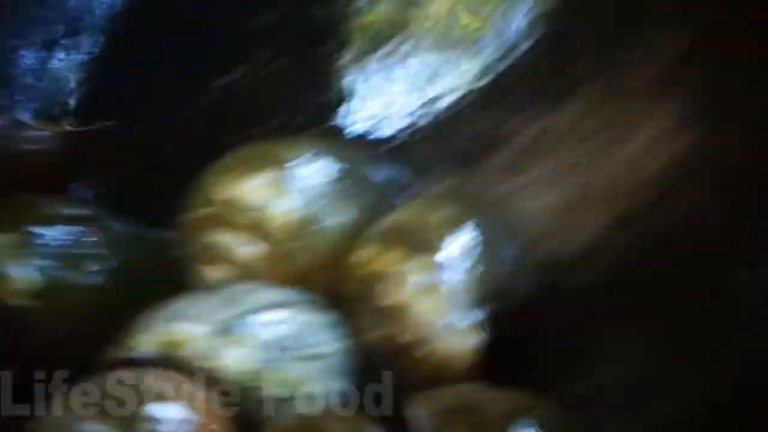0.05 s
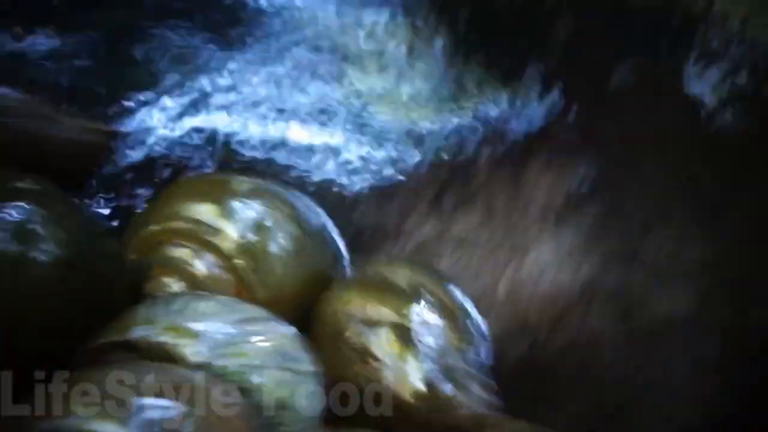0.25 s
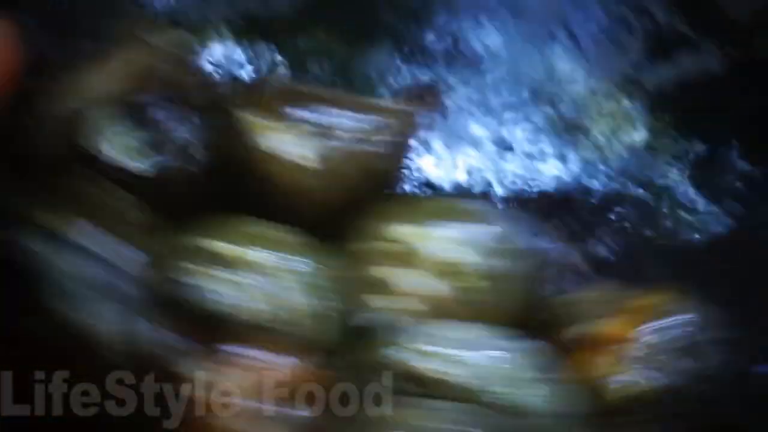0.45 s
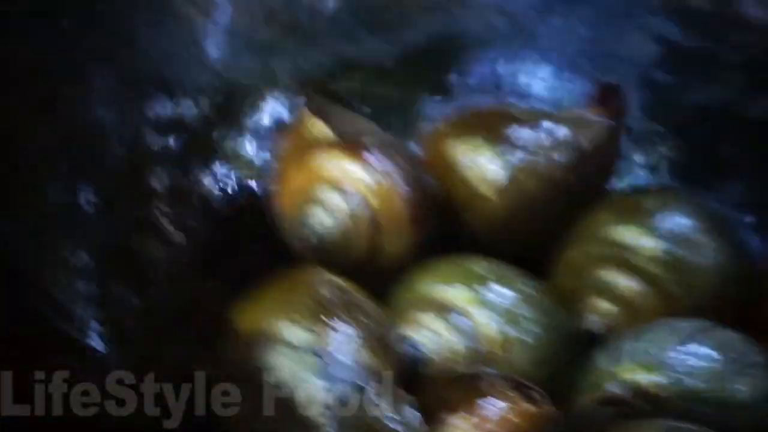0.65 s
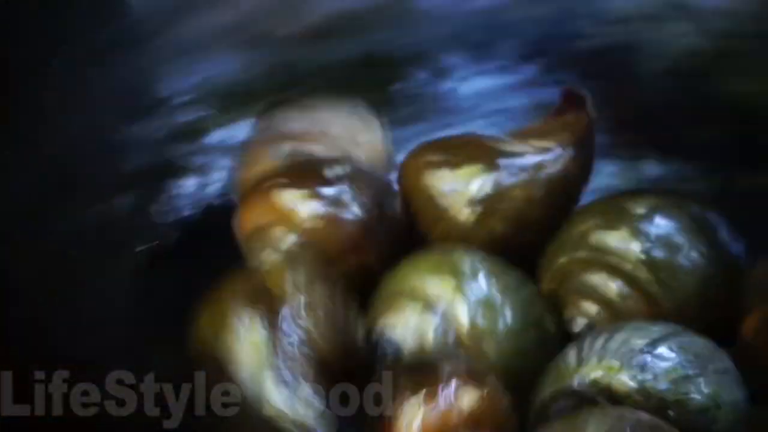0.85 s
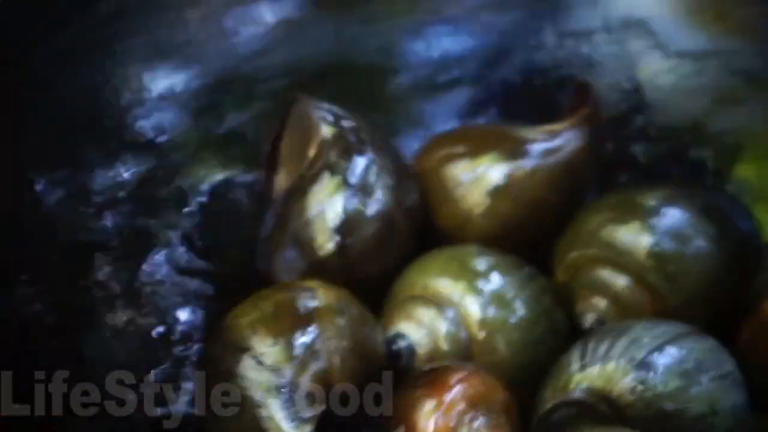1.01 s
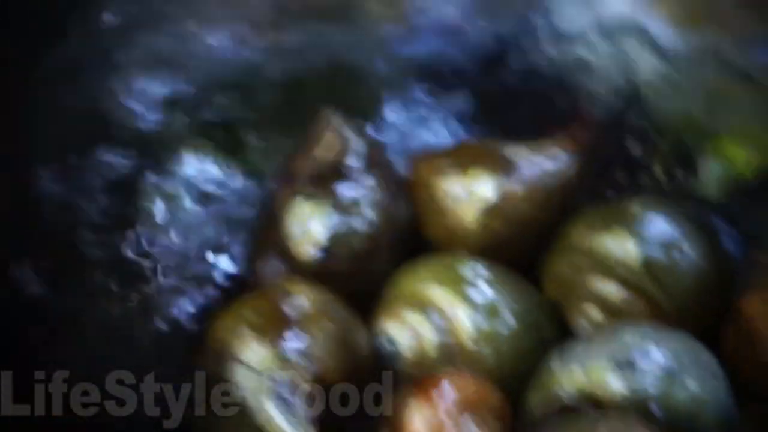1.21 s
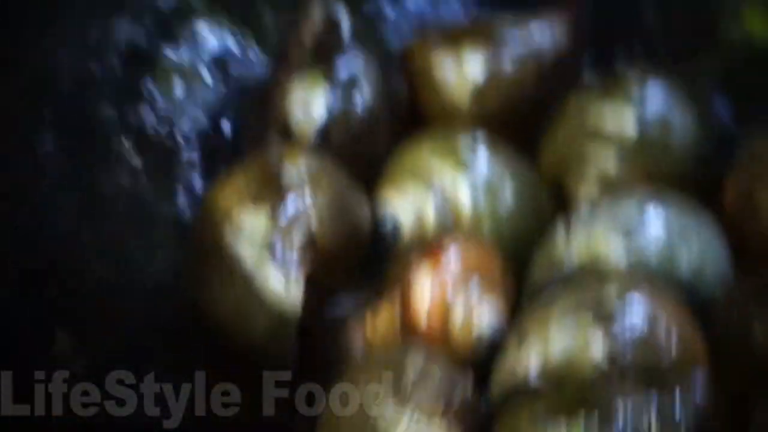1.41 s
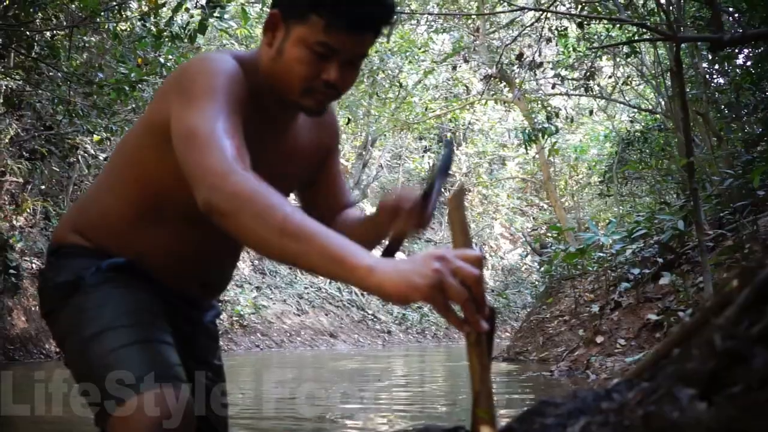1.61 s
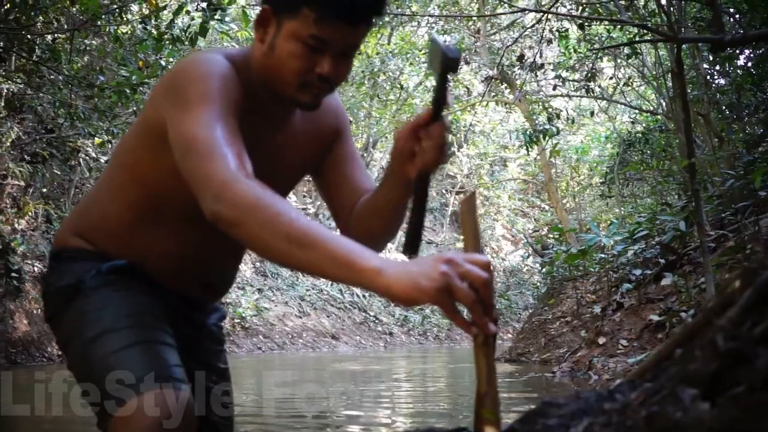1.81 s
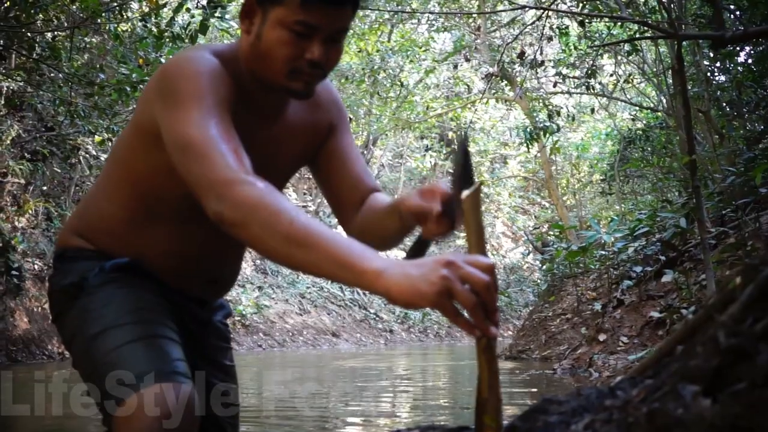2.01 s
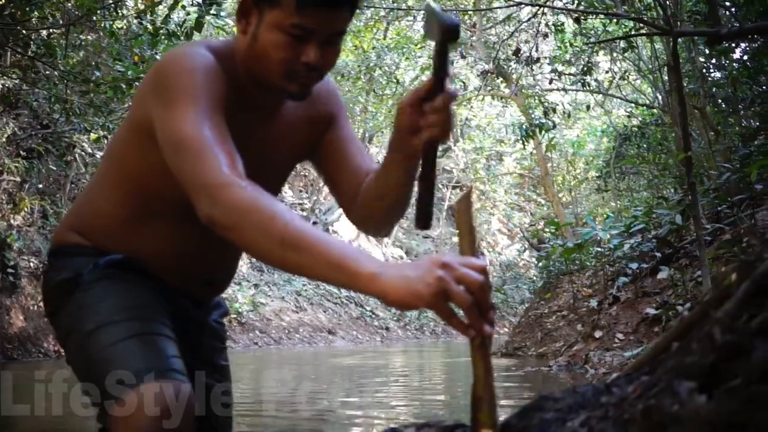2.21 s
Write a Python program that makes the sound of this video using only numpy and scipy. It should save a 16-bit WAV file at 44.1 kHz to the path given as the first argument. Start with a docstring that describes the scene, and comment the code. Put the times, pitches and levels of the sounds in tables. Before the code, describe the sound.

Wet snail shells are stirred in a tub, scraping and clicking with hollow bumps from about 0.2 to 0.7 seconds. A second run of quick strokes starts near 0.8 seconds and fades by 1.4. At 1.5 seconds the sound changes to a soft open stream with a few small drips. Just before 2 seconds, a hammer strikes a wooden stake once, with a sharp crack and brief echo.

```python
"""Snail shells stirred beside a stream

Wet shells are stirred by hand in a tub: stick-slip friction rings shells and tub in strokes of dense
scraping, with bumps, sharp clicks and hollow resonances that slide as single shells are dragged along.
At 1.5 s the scene changes to the open stream, where drops plink as their bubbles ring
and a hammer strikes a wooden stake once."""
import sys
import numpy as np
from scipy import signal
from scipy.fft import rfft, irfft
from scipy.io import wavfile

SR = 44100
rng = np.random.default_rng(int(sys.argv[2]) if len(sys.argv) > 2 else 0)


def master(y):
    """Save y as 16-bit WAV."""
    cut = np.clip(np.atleast_2d(y).T, -1, 1)
    pcm = np.round(cut * 32767)  # scale
    wavfile.write(sys.argv[1], SR, pcm.astype(np.int16))


N = 103635

# Modes of the tub and of a shell. Each row: nominal frequency in Hz, nominal bandwidth in Hz, gain in dB.
TUB_RESONANCES = [(274, 101.3, -1.5), (344, 108, 0.5), (433.4, 97, -5), (660, 94, -7), (783, 146, -8.5)]
SHELL_RESONANCES = [(1390, 235, -2), (1830, 220, 2.5), (2135, 214, 3), (2553, 220, 0.5), (3406, 564, -2)]
# Spectrum of a shell's click and a drop's splash. Each row: frequency in Hz, gain in dB.
CLICK_SPECTRUM = [(500, -29), (2500, -30), (4500, -1.5), (6800, -2.5), (9000, -4.5), (11200, -5)]
TUB_BAND_HZ, SHELL_BAND_HZ = (180, 1270), (930, 4700)
SLIPS_PER_S, SLIP_SPREAD_DB = 3300, 3


def stroke(rise, hold, fall, shells_db, tub_db, grit_db, rumble_db, shell_pitch, tub_pitch, count=5):
    """Stick-slip friction: the slips of several shells ring them and the tub, and crush grit."""
    # Spectra of the flexing tub and of the grit. Each row: frequency in Hz, gain in dB.
    rumble_spectrum = [(20, -4), (60, -12), (170, 7.5), (260, 3.5), (600, -49), (3000, -84)]
    grit_spectrum = [(300, -34), (2000, -22), (4200, 4.5), (5200, 1.5), (6300, -0.5), (7600, -3.5),
                     (9900, 0), (11200, -5)]
    t = np.arange(0, rise + hold + fall, 1 / SR)
    n = len(t)
    push = np.minimum(t / rise, 1) ** 1.16 * np.clip((t[-1] - t) / fall, 0, 1) ** 1.49
    chatter = amp(1.28 * wander(n, step_s=0.00804))
    slips = [impulses(n, SLIPS_PER_S / count, SLIP_SPREAD_DB) * chatter
             * amp(2 * wander(n, step_s=0.01436)) for _ in range(count)]  # each shell turns on its own
    shells = amp(shells_db) * shell_ring(slips, shell_pitch)
    tub = amp(tub_db) * unit_rms(resonate(sum(slips), TUB_RESONANCES, TUB_BAND_HZ, tub_pitch))
    rumble = amp(rumble_db) * unit_rms(colour(sum(slips), rumble_spectrum))
    grains = impulses(n, per_s=5000, spread_db=2.5) * chatter
    grit = amp(grit_db) * unit_rms(colour(grains, grit_spectrum))
    return push * reflections(shells + tub + grit + rumble)


def shell_ring(slips, pitch, tone_spread=0.092, glide_depth=0.029, tone_db=-6.5):
    """Forced resonance: shells of several sizes ring in broad modes and in tones that slide as they turn."""
    # A shell's clear tones. Each row: nominal frequency in Hz, bandwidth in Hz, gain in dB.
    clear_tones = [(1708, 74, 0), (2200, 58, 1), (3406, 85, -0.5)]
    n = len(slips[0])
    tunings = pitch * (1 + 0.038 * np.linspace(-1, 1, len(slips)))
    hollow = sum(resonate(x, SHELL_RESONANCES, SHELL_BAND_HZ, tuning)
                 for x, tuning in zip(slips, tunings))
    glides = [tuning * (1 + tone_spread * rng.uniform(-1.003, 1) + glide_depth * wander(n, 0.0296))
              for tuning in tunings]
    tones = sum(amp(db) * sliding_resonance(x, hz * glide, width)
                for x, glide in zip(slips, glides) for hz, width, db in clear_tones)
    return unit_rms(unit_rms(hollow) + amp(tone_db) * unit_rms(tones))


def bump(tub_db, shells_db, click_db, pitch):
    """Impact excitation: a shell drops against its neighbours and the tub, with a brief crunch."""
    contact = burst(t60=0.028)
    contact[0] = amp(16.5)  # the hard first strike
    tub = amp(tub_db) * fixed_energy(resonate(contact, TUB_RESONANCES, TUB_BAND_HZ, pitch))
    shells = amp(shells_db) * fixed_energy(resonate(contact, SHELL_RESONANCES, SHELL_BAND_HZ, pitch))
    click = amp(click_db) * fixed_energy(colour(burst(t60=0.035), CLICK_SPECTRUM))
    return reflections(tub + shells + click)


def drag(path):
    """Friction excites one shell, whose resonance slides as it turns against the others."""
    times, hz, db = np.transpose(path)
    t = np.arange(times[0], times[-1], 1 / SR)
    slips = impulses(len(t), SLIPS_PER_S, SLIP_SPREAD_DB)
    tone = unit_rms(sliding_resonance(slips, np.interp(t, times, hz), width_hz=196))
    return reflections(tone * amp(np.interp(t, times, db)) * signal.windows.tukey(len(t), .1))


def hammer(crack_db, ring_db, size=12000):
    """Damped free vibration: steel cracks on the stake, which rings; the bank and the forest echo."""
    # Modes of the stake. Each row: frequency in Hz, gain in dB, 60 dB decay time in seconds.
    stake_modes = [(220, 5, 0.035), (1470, 0, 0.035), (2145, 3.5, .03), (2570, 2.5, 0.042),
                   (2640, -3, 0.043), (6635, 1.5, 0.034), (9370, 0, 0.034)]
    # Spectra of the crack and of the forest's echo. Each row: frequency in Hz, gain in dB.
    crack_spectrum = [(100, -11), (270, 8), (800, -5.5), (1500, -3), (2600, 2), (3600, 3), (6500, 2),
                      (8000, 0), (9800, 7), (11200, 0.5)]
    forest_spectrum = [(300, 1), (800, -7), (11000, -1.5)]

    def stereo_burst(spectrum, t60):
        return np.array([fixed_energy(colour(burst(t60, size), spectrum)) for _ in range(2)])

    t = np.arange(size) / SR
    ring = sum(amp(db) * decay(t, t60) * np.sin(2 * np.pi * hz * t) for hz, db, t60 in stake_modes)
    blow = amp(crack_db) * stereo_burst(crack_spectrum, t60=0.024) + amp(ring_db) * fixed_energy(ring)
    bank = amp(-2) * stereo_burst(crack_spectrum, t60=0.052)
    forest = amp(-8.5) * stereo_burst(forest_spectrum, t60=0.28)
    add(blow, .0052, amp(crack_db) * (bank + forest))
    return blow


def drop(hz, db, t60, pan_db, rise_per_s=1.1, attack_s=0.00056):
    """Bubble resonance: a drop splashes and traps air, which rings with rising pitch as it dies."""
    t = np.arange(4096) / SR
    phase = 2 * np.pi * hz * (t + rise_per_s * t ** 2 / 2)
    bubble = np.sin(phase) * decay(t, t60) * np.minimum(t / attack_s, 1)
    splash = amp(-9.5) * colour(burst(t60=0.027), CLICK_SPECTRUM)
    return amp(db) * (bubble + splash) * amp([[pan_db / 2], [-pan_db / 2]])


def stream(spectrum, levels):
    """Random superposition: countless ripples merge into a wash over a low rumble."""
    # Likeness of the two ears. Each row: frequency in Hz, correlation from 0 to 1.
    ear_correlation = [(170, 0.95), (480, 0.33), (1400, 0.46), (4000, 0)]
    hz = np.fft.rfftfreq(N, 1 / SR)
    left, independent = (rfft(impulses(N, per_s=9000, spread_db=4)) for _ in range(2))
    likeness = np.clip(at_frequency(ear_correlation, hz), 0, 1)
    right = likeness * left + np.sqrt(1 - likeness ** 2) * independent
    wash = irfft(np.array([left, right]) * amp(at_frequency(spectrum, hz)), N)
    return unit_rms(wash) * amp(np.interp(np.arange(N) / SR, *np.transpose(levels)))


def reflections(x, right_lag_s=.000014):
    """Decorrelation: near reflections spread a sound between the ears, the treble most."""
    # Strength of the reflections. Each row: frequency in Hz, gain in dB.
    side_spectrum = [(350, -14.5), (750, -9), (1300, -13), (2200, -9.5), (3500, -4), (5500, -2)]
    tail = burst(t60=0.025, size=8192)
    reflected = signal.fftconvolve(x, tail / np.linalg.norm(tail))[:len(x)]
    side = colour(reflected, side_spectrum)
    lag = np.exp(-2j * np.pi * np.fft.rfftfreq(len(x), 1 / SR) * right_lag_s)
    right = irfft(rfft(x - side) * lag, len(x))
    return np.array([x + side, right]) / np.sqrt(1 + np.sum(side ** 2) / np.sum(x ** 2))


def resonate(x, modes, band_hz, pitch):
    """Modal superposition: broad modes of alternating sign, radiating only within a band."""
    ring = sum((-1) ** k * amp(db) * signal.lfilter(*signal.iirpeak(hz * pitch, hz / width, SR), x)
               for k, (hz, width, db) in enumerate(modes))
    radiation = signal.butter(3, np.multiply(band_hz, pitch), "band", fs=SR, output="sos")
    return signal.sosfilt(radiation, ring)


def sliding_resonance(x, hz, width_hz):
    """Two resonators in cascade, each width_hz wide, follow the pitch curve hz."""
    carrier = np.exp(2j * np.pi * np.cumsum(hz) / SR)
    pole = np.exp(-np.pi * width_hz / SR)
    envelope = signal.lfilter([(1 - pole) ** 2], [1, -2 * pole, pole * pole], x / carrier)
    return 2 * (carrier * envelope).real


def colour(x, spectrum, size=2048):
    """Minimum-phase filtering with the given spectrum."""
    log_gain = np.log(amp(at_frequency(spectrum, abs(np.fft.fftfreq(size, 1 / SR)))))
    taps = np.fft.ifft(np.exp(np.conj(signal.hilbert(log_gain)))).real
    return signal.fftconvolve(x, taps[:size // 2])[:len(x)]


def impulses(n, per_s, spread_db):
    """Shot noise: random impulses, a few much stronger than the rest."""
    chance, size, sign = rng.random((3, N))[:, :n]
    strength = amp(-spread_db * np.log(np.maximum(size, .02)))
    return (chance < per_s / SR) * strength * np.sign(sign - .5)


def burst(t60, size=4096):
    """Exponentially damped white noise."""
    return rng.choice([-1., 1.], size) * decay(np.arange(size) / SR, t60)


def wander(n, step_s):
    """Random drift between Gaussian values step_s apart."""
    knots = rng.standard_normal(N // 16)
    return np.interp(np.arange(n) / SR / step_s, np.arange(len(knots)), knots)


def decay(t, t60):
    """Exponential decay by 60 dB in t60 seconds."""
    return np.exp(-np.log(1000) * t / t60)


def amp(db):
    """Decibels to amplitude ratio."""
    return 10 ** (np.asarray(db) / 20)


def unit_rms(x):
    """Normalises mean power to 1."""
    return x / np.sqrt(np.mean(x ** 2) + 1e-20)


def fixed_energy(x):
    """Normalises a transient to the energy of 5 ms at rms 1."""
    return x * np.sqrt(220) / np.linalg.norm(x)


def at_frequency(points, hz):
    """Interpolates a table on a log-frequency axis."""
    frequencies, values = np.transpose(points)
    return np.interp(np.log(hz + 1), np.log(frequencies + 1), values)


def add(mix, start_s, sound):
    """Superposes a stereo sound on the mix."""
    part = mix[:, max(round(start_s * SR), 0):][:, :sound.shape[-1]]
    part += sound[..., :part.shape[1]]


def scene():
    """Linear superposition of shells, hammer, drops and stream."""
    # Strokes of the hand. Each row: start, rise, hold and fall in seconds, levels of shells, tub, grit
    # and rumble in dB, pitch factors of shells and tub.
    strokes = [(0.149, 0.02, 0.065, .03, -50.5, -45.5, -48.5, -54, 1.1, 1.84),
               (0.194, 0.13, 0.018, 0.057, -23, -24, -31, -37.5, 0.95, 0.99),
               (0.336, 0.052, 0.027, 0.036, -18.5, -26, -29, -41, 1.003, 0.94),
               (.41, 0.056, 0.065, 0.08, -20, -25, -30.5, -62, 0.99, 0.98),
               (.525, 0.029, 0.051, 0.092, -21, -24, -31.5, -52, 0.99, 0.99),
               (0.738, 0.033, 0.019, 0.037, -33.5, -35.5, -45.5, -74, 0.98, 1),
               (0.838, 0.044, 0.044, 0.039, -18, -25, -31, -45, 1.013, 1.07),
               (0.948, 0.023, 0.061, 0.06, -18, -24.5, -28.5, -46.5, 0.98, 1.096),
               (1.064, 0.039, 0.026, 0.022, -19, -26.5, -31, -54, 1, 1.1),
               (1.135, 0.055, .004, 0.064, -21.5, -24.5, -35, -55, 0.98, 1.176),
               (1.248, 0.053, 0.0081, 0.051, -27.5, -29.5, -40, -64, 0.95, 1.06),
               (1.336, 0.026, 0.08, 0.034, -54, -47, -61, -71, 0.69, 1.02)]
    # Shell impacts. Each row: start in seconds, levels of tub, shells and click in dB, pitch factor.
    bumps = [(.090, -42, -48.5, -49, 1.93), (.147, -51, -54, -26, 0.88), (.200, -30, -30, -46, 0.66),
             (0.2093, -21, -30, -48, 0.98), (.262, -26.5, -27, -38, 0.83), (0.239, -25.5, -24.5, -52, 0.94),
             (.335, -30, -18, -31, 0.93), (.3735, -25, -22, -32, 1.13), (.406, -31.5, -18.5, -42.5, 1.12),
             (.427, -49, -30, -20, 1.4), (0.5249, -38, -22, -43, 0.946), (0.8512, -20, -32, -38.5, 0.997),
             (0.854, -24.5, -28, -35, 1.07), (.934, -23.5, -29, -26, 0.75),
             (1.0568, -22.5, -19.5, -47, 0.95), (1.077, -29, -21, -30.5, 1.06),
             (1.1038, -26, -20, -39, 0.97), (1.1324, -25, -17.5, -29.5, 1.07),
             (1.1832, -25, -15, -29, 1.04), (1.2, -50, -19.5, -31, 1.16), (1.268, -30, -31.5, -47, 0.88),
             (1.300, -42, -22, -48, 0.9), (1.320, -34.5, -28, -45, 0.85), (1.372, -42, -44, -54, 0.91),
             (1.398, -39.5, -44, -53, 1.08), (1.4293, -40, -28.5, -37.5, 1.08)]
    # One path per dragged shell. Each row of a path: time in seconds, pitch in Hz, level in dB.
    drag_paths = [
        [(.262, 3440, -33), (.295, 3350, -29.5), (.335, 3510, -30.5), (.35, 3400, -40)],
        [(.44, 1810, -29), (.468, 1695, -26), (.505, 1616, -27), (.527, 1480, -21.5), (.552, 1370, -37),
         (.612, 1380, -27), (.63, 1410, -42)],
        [(.47, 1980, -41), (.505, 2060, -28), (.524, 2290, -20.5), (.55, 2040, -24), (.577, 2050, -22.5),
         (.605, 2150, -26), (.627, 2090, -31), (.646, 2160, -32), (.66, 2177, -47)],
        [(1.177, 1880, -26), (1.197, 2140, -24), (1.212, 1870, -31), (1.236, 1730, -32)],
    ]
    # The hammer blow: start in seconds, levels of crack and ring in dB.
    blow = (1.9514, -20, -24)
    # Falling drops. Each row: start in seconds, initial pitch in Hz, level in dB,
    # 60 dB decay time in seconds, left over right in dB.
    drops = [(1.529, 1340, -42, 0.015, 13), (1.532, 814, -44.5, 0.12, 12), (1.562, 1850, -37, 0.043, 10),
             (1.637, 1340, -39.5, 0.019, 17), (1.644, 2900, -36.5, 0.02, 11), (1.9267, 1900, -32, 0.042, 4),
             (1.9917, 2920, -35, 0.014, 17)]
    # The stream beside the tub and in the open. Each row: frequency in Hz, relative density in dB.
    near_spectrum = [(24, -39), (40, -4.5), (340, -8), (494, -13.5), (703, -10), (1420, -14.5), (1750, -12),
                     (3910, -15), (11000, -23)]
    open_spectrum = [(18, -38.5), (30, -5), (146, -4.5), (270, -7.5), (338, -16), (432, -14), (658, -14),
                     (885, -12), (1250, -16.5), (1810, -12.5), (2050, -14), (11000, -26.5)]
    # Its loudness in each place. Each row: time in seconds, level in dB.
    near_levels = [(0, -42), (0.069, -47), (.7, -48), (1.46, -50), (1.497, -50.5), (1.503, -83.5)]
    open_levels = [(1.495, -88), (1.507, -55.5), (1.561, -47.5), (1.66, -45.5), (1.85, -44), (2.35, -45)]
    mix = stream(near_spectrum, near_levels) + stream(open_spectrum, open_levels)
    for source, rows in (stroke, strokes), (bump, bumps), (drop, drops), (hammer, [blow]):
        for start, *row in rows:
            add(mix, start, source(*row))
    for path in drag_paths:
        add(mix, path[0][0], drag(path))
    return mix


def record(dry, cutoff_hz=11130):
    """Band limiting: a steep low-pass filter removes the highest treble."""
    taps = signal.firwin(511, cutoff_hz, window=("kaiser", 9), fs=SR)
    return signal.oaconvolve(dry, taps[None], "same")


dry = scene()
out = record(dry)
master(out)
```